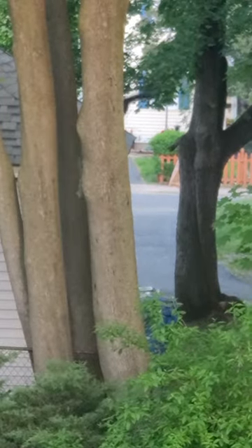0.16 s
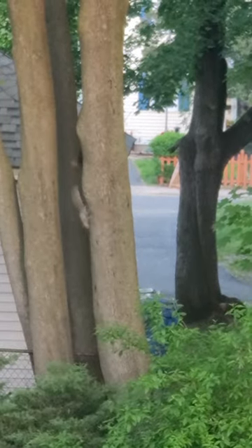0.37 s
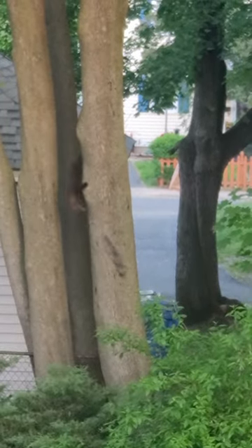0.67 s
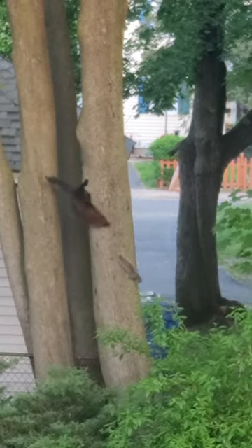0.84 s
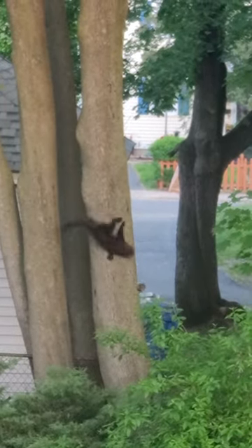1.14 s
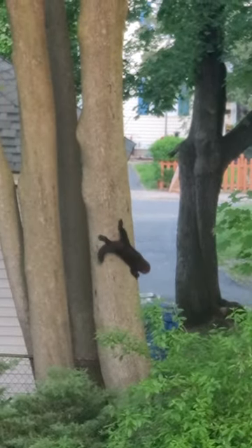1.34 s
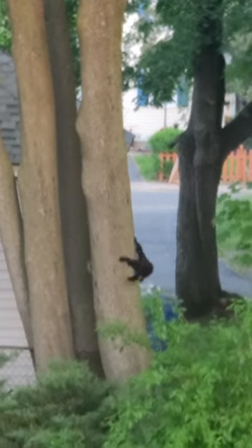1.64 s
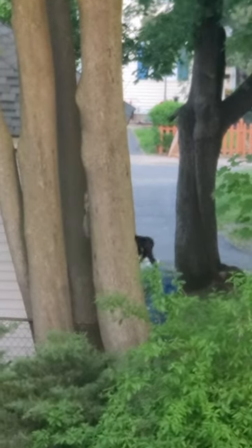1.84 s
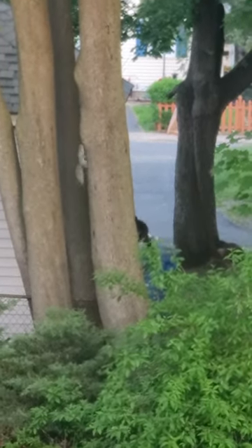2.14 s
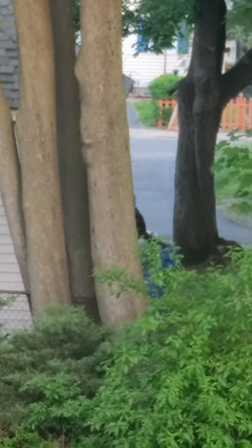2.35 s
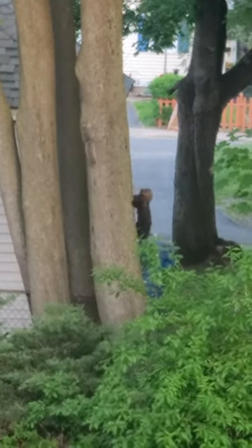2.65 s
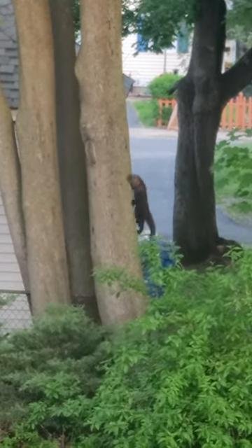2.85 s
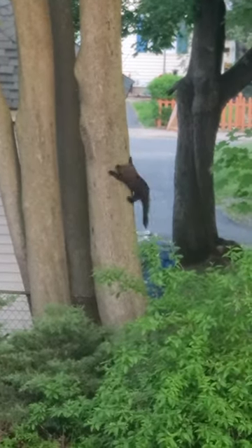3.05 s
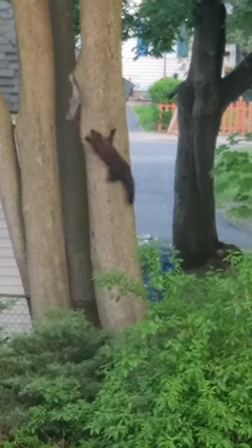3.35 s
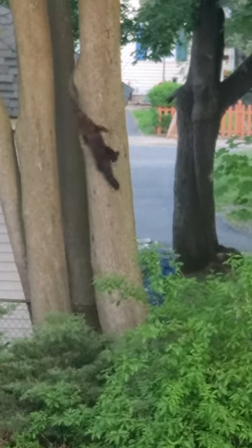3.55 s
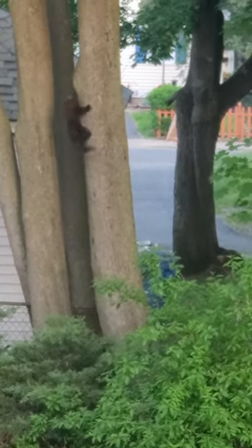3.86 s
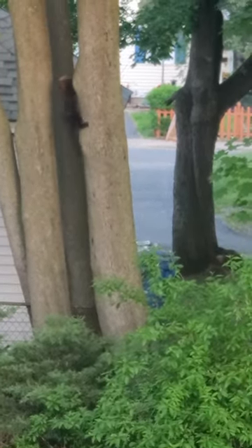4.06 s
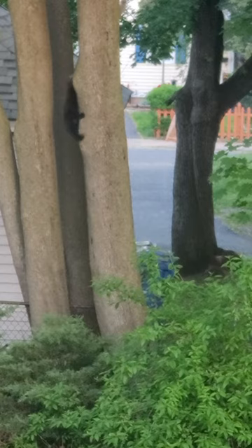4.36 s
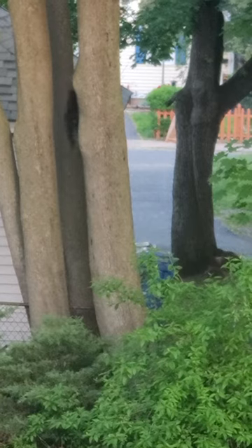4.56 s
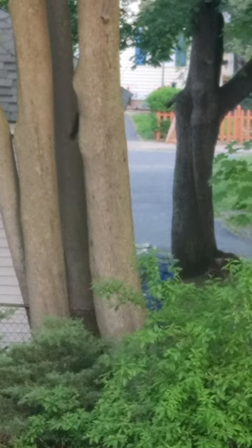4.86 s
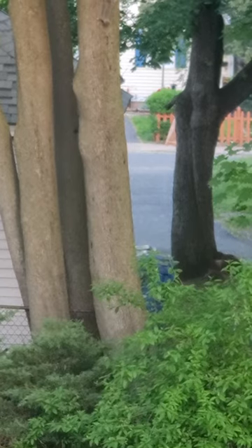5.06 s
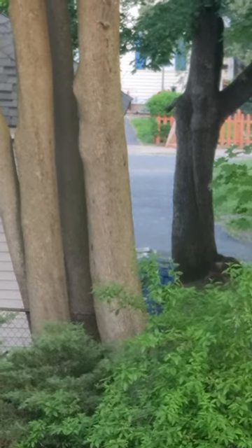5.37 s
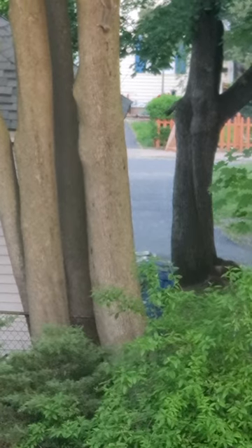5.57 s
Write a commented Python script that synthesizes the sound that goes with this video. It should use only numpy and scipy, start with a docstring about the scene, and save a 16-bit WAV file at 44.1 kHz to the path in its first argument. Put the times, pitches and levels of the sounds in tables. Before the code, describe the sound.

Two squirrels chase around tree trunks as harsh, scolding caw-like cries and short nasal yelps repeat quickly over a faint low hum.

```python
"""Among trees and houses, hoarse animal calls, probably crows scolding, overlap some way off.
Caws are rasps of breath noise in throat resonances, streaked by wavering tones and narrow nasal bands.
Clearer calls are short arches of pitch, mostly strongest on the second harmonic; echoes smear them.
A distant motor, a wavering tone with its octave, hums near 150 Hz over dull traffic rumble of noise bands."""
import sys
import numpy as np
from scipy import signal
from scipy.io import wavfile

SR = 44100
rng = np.random.default_rng(int(sys.argv[2]) if len(sys.argv) > 2 else 0)


def generate_wav(sig):
    """Save sig (samples, or channels by samples) to the path in sys.argv[1] as 16-bit PCM at SR."""
    pcm = np.round(np.clip(np.atleast_2d(sig).T, -1, 1) * 32767).astype(np.int16)
    wavfile.write(sys.argv[1], SR, pcm)


N = 252230

STRAND_DB = -1.5   # wavering tones re breath noise
NOISE_LAG_SAMPLES, CALL_LAG_SAMPLES = 9, 4   # right after left; callers nearer the middle
WHITE = rng.standard_normal((3, N))   # common, left, right


def amp(db):
    """Amplitude factor of a level in dB."""
    return 10 ** (np.asarray(db) / 20)


def rms_one(x):
    """Scale to rms 1."""
    return x / np.sqrt(np.mean(x ** 2) + 1e-20)


def in_time(rows):
    """Columns of a time table, interpolated to every sample."""
    s, *columns = np.transpose(rows)
    return [np.interp(np.arange(N) / SR, s, column) for column in columns]


def at_hz(points, hz):
    """Value of a frequency table at hz, linear in log frequency."""
    table_hz, values = np.array(points).T
    return np.interp(np.log(hz), np.log(table_hz), values)


def drift(rate_hz):
    """Slow chance: noise at every 32nd sample through a double one-pole low-pass, run in; spread about 1."""
    r = np.exp(-64 * np.pi * rate_hz / SR)
    noise = rng.standard_normal(N // 32 + 2002)
    slow = signal.lfilter([1], [1, -2 * r, r * r], noise)[2000:]
    return np.interp(np.arange(N) / 32, np.arange(len(slow)), rms_one(slow - slow.mean()))


def stereo_noise(hz):
    """Common noise, later on the right, plus noise of each side's own; a random stretch each time."""
    # power share common to both sides: f/Hz, share
    likeness = [(40, 0.97), (150, 1), (350, 0.85), (700, 0.786), (1400, 0.453), (2800, 0.35), (6000, 0.2),
                (12000, 0.07)]
    # side balance: f/Hz, left minus right/dB
    balance = [(60, 0), (180, -0.5), (550, 0), (1650, 0.5), (4970, -1), (15000, -0.5)]
    share = np.clip(at_hz(likeness, hz), 0, 1)
    tilt_db = at_hz(balance, hz) / 2
    common, left, right = np.roll(WHITE, rng.integers(N), axis=1)
    shared = np.array([common, np.roll(common, NOISE_LAG_SAMPLES)])
    both = np.sqrt(share) * shared + np.sqrt(1 - share) * np.array([left, right])
    return both * amp([[tilt_db], [-tilt_db]])


def yard(x, echo_db):
    """Direct sound, a little later on the right, plus dense echoes off trunks and walls, unlike on each side."""
    t60_s, first_echo_s = .28, .006
    t = np.arange(SR // 2) / SR
    tail = rng.standard_normal((2, len(t))) * amp(-60 * t / t60_s) * (t > first_echo_s)
    tail = tail / np.sqrt(np.sum(tail ** 2) / 2)   # unit energy per side on average
    echoes = signal.fftconvolve(x[None], tail, axes=1)[:, :N]
    return np.array([x, np.roll(x, CALL_LAG_SAMPLES)]) + amp(echo_db) * echoes


def rumble():
    """Narrow bands of far traffic and air, each swelling a little on its own."""
    # spectrum before scaling to rms 1: f/Hz, density/dB per Hz
    spectrum = [(15, -48), (25, -14.5), (150, 2.5), (264, -13.5), (462, -15), (729, -11.5), (1000, -22.5),
                (1460, -10.5), (2430, -37), (4000, -36), (6040, -27), (7280, -65.5), (7890, -64.5),
                (8780, -60.5), (11200, -44.5), (15000, -65)]
    # overall level: t/s, level/dB
    level = [(0.0, -29), (2.5, -29), (4.0, -30.5), (5.72, -30.5)]
    out, edges_hz = 0, 28 * 2 ** (np.arange(24) / 2.5)
    for low_hz, high_hz in zip(edges_hz, edges_hz[1:]):
        hz = np.sqrt(low_hz * high_hz)
        band_pass = signal.butter(2, [low_hz, high_hz], "band", fs=SR, output="sos")
        band = signal.sosfilt(band_pass, stereo_noise(hz))
        out = out + amp(at_hz(spectrum, hz) + 1.68 * drift(7.8)) * band
    return amp(in_time(level)[0]) * rms_one(out)


def hum():
    """Motor tone wavering in pitch and level, with its octave."""
    centre_hz, waver_hz, octave_db = 154.06, 2.72, -14.5
    # mean level of the lower tone: t/s, level/dB
    level = [(0.0, -35.5), (1.2, -32.5), (2.7, -31.5), (3.3, -42.5), (4.5, -34.5), (5.72, -35.5)]
    phase = 2 * np.pi * np.cumsum(centre_hz + waver_hz * drift(4.29)) / SR
    gain = np.sqrt(2) * amp(in_time(level)[0] + 2.04 * drift(3.15))
    return gain * (np.sin(phase) + amp(octave_db) * np.sin(2 * phase))


def swell(age, rise, fall):
    """Soft rise, then a fall that steepens, 20 dB down after fall; height 1."""
    rise_curve, fall_curve = 1.47, 2.407
    up = np.sin(np.pi / 2 * np.clip(age / rise, 0, 1)) ** rise_curve
    return up * amp(-20 * (np.maximum(age - rise, 0) / fall) ** fall_curve)


def caw_shapes():
    """Each caw swells and falls ever faster, its echo hangs on; caws add in power. Five gains."""
    # hoarse caws: start t/s, rise/s and fall to 20 dB down/s before stretch,
    # gains of hiss/dB, low throat/dB, high throat/dB, top hiss/dB, middle hiss/dB
    caws = [(-.103, .139, .36, -26.5, -22.5, -22, -44, -34),
            (.329, .071, .363, -27.5, -22, -28.5, -46.5, -35),
            (.583, .078, .254, -32, -32.5, -33.5, -46.5, -43),
            (.945, .089, .266, -38.5, -30.5, -41.5, -54.5, -48),
            (1.288, .025, .04, -47, -60, -60, -52.5, -54), (1.424, .108, .024, -30.5, -31, -29, -49, -42),
            (1.502, .097, .177, -29, -29, -26, -46.5, -37), (1.845, .03, .2, -30, -30, -40.5, -48.5, -44),
            (1.97, .075, .225, -31, -34, -29.5, -48.5, -43), (2.2, .05, .36, -31.5, -29, -35.5, -51, -38),
            (2.33, .104, .3, -35, -36, -35, -47, -44), (2.511, .064, .12, -26.5, -29, -34.5, -47, -37),
            (2.581, .109, .28, -27.5, -28, -27, -47, -36), (2.8, .128, .15, -29.5, -29, -39.5, -44, -40),
            (2.87, .15, .19, -28.5, -49, -25, -43, -38), (3.03, .079, .5, -31.5, -27.5, -33, -49, -40),
            (3.196, .026, .25, -28.5, -21.5, -52.5, -49.5, -37),
            (3.29, .148, .093, -26, -21.5, -24.5, -45.5, -34), (3.474, .04, .19, -30, -26, -35, -44.5, -39),
            (3.59, .094, .253, -28.5, -27, -29.5, -44, -37), (3.766, .119, .18, -36, -29.5, -54, -60, -44),
            (4.072, .11, .16, -23.5, -21.5, -28, -41, -33),
            (4.378, .103, .124, -32, -25.5, -34, -51.5, -40),
            (4.496, .113, .122, -23.5, -21, -26, -39.5, -32), (4.63, .08, .12, -28, -24.5, -48, -47.5, -36),
            (4.985, .11, .165, -24, -22.5, -30.5, -42.5, -33.5),
            (5.348, .085, .17, -33, -31.5, -39, -54.5, -42), (5.506, .124, .3, -29.5, -24, -35, -49, -38)]
    # by layer (hiss, low, high, top, middle): factor on the rise
    rise_stretch = [1, 1.459, 0.55, 1.07, .95]
    # same layers: factor on the fall
    fall_stretch = [1, 0.715, 1.22, 1.174, 1.3]
    # same layers: hanging echo level/dB
    hang_db = [-3.5, -3, -4.5, -14.5, -2.5]
    hang_t60_s = 0.764
    t, power = np.arange(N) / SR, np.full((5, N), 1e-12)
    for start_s, rise_s, fall_s, *levels_db in caws:
        on = slice(max(int(start_s * SR), 0), int((start_s + 1) * SR))
        shape = swell(t[on] - start_s, rise_s * np.c_[rise_stretch], fall_s * np.c_[fall_stretch])
        power[:, on] += (amp(np.c_[levels_db]) * shape) ** 2
    r = amp(-120 / (hang_t60_s * SR))   # power decay per sample
    lingering = signal.lfilter([1 - r], [1, -r], power, zi=power[:, :1])[0]
    return np.sqrt(power + amp(np.c_[hang_db]) ** 2 * lingering)


def throat(modes, patchy_db, flutter_db):
    """Fluttering breath noise twice through each resonance, which keeps the valleys dark; rms 1."""
    out, flutter = 0, amp(flutter_db * drift(78))
    for hz, width_hz, level_db in modes:
        r = np.exp(-np.pi * width_hz / SR)
        b = [1, 0.0227, -0.9743]   # zeros near 0 Hz and SR/2
        a = [1, -2 * r * np.cos(2 * np.pi * hz / SR), r * r]
        once = signal.lfilter(b, a, flutter * stereo_noise(hz))
        band = signal.lfilter(b, a, once)
        out = out + amp(level_db + patchy_db * drift(13.56)) * rms_one(band)
    return rms_one(out)


def strands(centres_hz):
    """Half-voiced tones of farther callers: each wanders in pitch, comes and goes, and echoes; rms 1."""
    out = 0
    for hz in centres_hz:
        pitch_hz = hz * (1 + .035 * drift(9) + .014 * drift(60))
        phase = 2 * np.pi * np.cumsum(pitch_hz) / SR
        out = out + amp(4 * drift(8) + 2.5 * drift(50)) * np.sin(phase)
    return rms_one(yard(out, echo_db=-1))


def nasal():
    """Narrow nasal bands inside the caws: low-passed noise carried on a gliding centre."""
    # start t/s, rise/s, fall to 20 dB down/s, level before flicker/dB, start f/Hz, end f/Hz
    bands = [(-.05, .08, .3, -37, 3550, 3380), (.38, .06, .25, -39, 3450, 3500),
             (.62, .05, .18, -37, 3580, 3480), (1.5, .08, .18, -37, 3500, 3500),
             (1.85, .025, .12, -37, 3100, 3160), (1.855, .02, .08, -36, 4900, 5650),
             (2.0, .07, .16, -42, 3150, 3250), (1.04, .04, .16, -44, 4750, 4800),
             (2.17, .06, .15, -45, 3450, 3650), (2.36, .04, .2, -35, 3500, 3440),
             (2.56, .04, .15, -36, 3450, 3480), (2.9, .03, .2, -31.5, 3500, 3470),
             (3.2, .03, .15, -41, 3150, 3150), (3.38, .04, .1, -38, 3380, 3500),
             (3.52, .05, .12, -40, 3250, 3350), (3.64, .08, .33, -41, 3350, 3650),
             (4.085, .05, .16, -31, 3300, 3430), (4.4, .04, .1, -44, 3330, 3400),
             (4.53, .045, .22, -31.5, 3380, 3430), (4.975, .04, .24, -34, 3150, 3520),
             (5.37, .04, .1, -45, 3380, 3420), (5.56, .05, .25, -39, 3500, 3620)]
    half_width_hz = 70
    low_pass = signal.butter(2, half_width_hz, fs=SR, output="sos")
    t, out = np.arange(N) / SR, np.zeros((2, N))
    # both carriers take the stereo image of the first band
    p, q = (rms_one(signal.sosfilt(low_pass, stereo_noise(bands[0][-1]))) for part in range(2))
    for start_s, rise_s, fall_s, level_db, from_hz, to_hz in bands:
        on = slice(max(int(start_s * SR), 0), int((start_s + 1) * SR))
        age = t[on] - start_s
        centre_hz = np.interp(age, [0, rise_s + fall_s], [from_hz, to_hz])
        phase = 2 * np.pi * np.cumsum(centre_hz) / SR
        band = p[:, on] * np.cos(phase) + q[:, on] * np.sin(phase)
        out[:, on] += amp(level_db) * swell(age, rise_s, fall_s) * band
    return amp(1.5 * drift(15.7)) * out


def rasp():
    """Hoarse body of all the calls: breath noise in throat resonances, streaked by wavering tones."""
    # throat resonances, low: f/Hz, width/Hz, relative level/dB
    low_modes = [(730, 220, -18.5), (1130, 200, -15), (1290, 200, -4), (1440, 260, 0.5)]
    # high: f/Hz, width/Hz, relative level/dB
    high_modes = [(1749, 277, 7), (2000, 760, -1), (2199, 223, -7.5)]
    # hiss: f/Hz, width/Hz, relative level/dB
    hiss_modes = [(4815, 140, -7.5), (5239, 625, 1.5), (5808, 348, -0.5), (6188, 485, 0),
                  (7040, 435, -14.5)]
    # middle hiss: f/Hz, width/Hz, relative level/dB
    mid_modes = [(2350, 400, -5.5), (2750, 400, -8.5), (3100, 450, -2), (3550, 400, 0.5), (4350, 630, -1.5)]
    # thin top hiss: f/Hz, width/Hz, relative level/dB
    top_modes = [(9000, 1110, -8), (10550, 3080, -3), (12900, 2500, -16), (14300, 1400, -43)]
    hiss_gain, low_gain, high_gain, top_gain, mid_gain = caw_shapes()
    low = throat(low_modes, patchy_db=4.0, flutter_db=-0.5)
    low = low + amp(STRAND_DB) * strands([1275, 1345, 1421.8, 1497.3])
    high = throat(high_modes, patchy_db=3.0, flutter_db=0.0)
    high = high + amp(STRAND_DB) * strands([1680, 1790, 1900])
    hiss = throat(hiss_modes, patchy_db=1.5, flutter_db=0.27)
    hiss = hiss + amp(STRAND_DB - 4.5) * strands([4850, 5144, 5533, 5890, 6288, 6561])
    mid = throat(mid_modes, patchy_db=2.5, flutter_db=0.3)
    mid = mid + amp(STRAND_DB - 3) * strands([2300, 3150, 3450, 3650, 4300])
    top = throat(top_modes, patchy_db=0.5, flutter_db=1.0)
    noise = low_gain * low + high_gain * high + hiss_gain * hiss + top_gain * top + mid_gain * mid
    return noise + nasal()


def voices():
    """Pitch and level rise to a top and fall; rough calls wobble in pitch, throb and break up in level."""
    # voiced calls: top t/s, rise/s, fall/s, top pitch f/Hz, second harmonic level before roughness/dB,
    # roughness 0-1, fundamental at the top re second harmonic/dB
    calls = [(.09, .06, .05, 880, -25, .4, -24), (.16, .05, .1, 750, -22, .4, -22),
             (.4, .04, .06, 720, -23, .4, -16), (.46, .04, .08, 735, -23, .45, -18),
             (.53, .04, .05, 910, -29, .35, -24), (.7, .05, .07, 665, -32, .35, -20),
             (1.1, .092, .11, 755, -27.5, .4, -20), (1.57, .061, .097, 940, -26, .35, -24),
             (1.59, .0738, .0803, 643, -23, .42, -22), (1.878, .026, .0458, 661, -29, .05, -14),
             (1.92, .08, .1, 765, -31, .3, -3), (2.03, .05, .09, 775, -30, .3, -12),
             (2.28, .045, .06, 708, -14, .27, -26), (2.722, .045, .075, 755, -13, .2, -24),
             (2.94, .05, .05, 740, -34, .4, -3), (3.105, .055, .075, 750, -11.5, .24, -18),
             (3.28, .06, .06, 715, -27, .5, -18), (3.45, .059, .075, 752, -11, .27, -18),
             (3.73, .047, .06, 730.2, -23, .5, -13), (3.875, .06, .075, 745, -14.5, .24, -17),
             (4.13, .03, .04, 850, -25, .5, -18), (4.155, .045, .055, 789.8, -18, .4, -16),
             (4.262, .045, .045, 760, -16, .3, -17), (4.34, .04, .07, 680, -27, .4, -14),
             (4.46, .055, .0636, 722.2, -33, .2, -6), (4.575, .045, .065, 790, -19, .3, -15),
             (4.7, .045, .07, 753, -18, .3, -17), (4.81, .05, .0476, 696, -33, .5, -3),
             (5.04, .0443, .05, 870, -25, .5, -16), (5.09, .04, .05, 770, -15, .3, -17),
             (5.14, .04, .1, 735, -16, .4, -17), (5.44, .072, .06, 698, -31, .4, -6),
             (5.61, .041, .07, 741, -20, .25, -14), (5.68, .04, .09, 715, -22, .45, -18)]
    # harmonics 2 to 5: level re second/dB
    harmonics_db = [0, -24, -32, -30]
    arch_drop, arch_curve = .25, 1.8   # pitch share lost at the ends of a clear call; roundness of the top
    first_fade_db = 9   # extra drop of the fundamental at both ends
    throb_hz = 50   # mean rate of the hoarse beating
    out, t = np.zeros(N), np.arange(N) / SR
    wobble, breakup = drift(70), drift(70)
    throb = np.cos(2 * np.pi * np.cumsum(throb_hz * (1 + .3 * drift(12))) / SR)
    for top_s, rise_s, fall_s, pitch_hz, level_db, rough, first_db in calls:
        on = (t > top_s - rise_s) & (t < top_s + fall_s)
        # 0 on top, 1 at the ends
        away = np.where(t[on] < top_s, (top_s - t[on]) / rise_s, (t[on] - top_s) / fall_s)
        drop = arch_drop * (1 - .7 * rough) * away ** arch_curve   # rough calls are flatter
        phase = 2 * np.pi * np.cumsum(pitch_hz * (1 - drop + .05 * rough * wobble[on])) / SR
        levels_db = [first_db - first_fade_db * away, *harmonics_db]
        tone = sum(amp(db) * np.sin(k * phase) for k, db in enumerate(levels_db, 1))
        hoarse = (1 + np.clip(.2 + rough, 0, 1) * throb[on]) * amp(5 * rough * breakup[on])
        arch = np.cos(np.pi / 2 * away) ** 1.3
        out[on] += np.sqrt(2) * amp(level_db) * hoarse * arch * tone
    return out


def scene():
    """Echoing voiced calls, rasping caws, rumble and hum together."""
    return yard(voices(), echo_db=-8) + rasp() + rumble() + hum()


def record(dry):
    """The highest peaks are rounded, the top is cut."""
    cutoff_hz = 15600
    rounded = 1.3 * np.tanh(dry / 1.3)
    low_pass = signal.ellip(12, .5, 70, cutoff_hz, fs=SR, output="sos")
    return signal.sosfilt(low_pass, rounded)


dry = scene()
out = record(dry)
generate_wav(out)
```